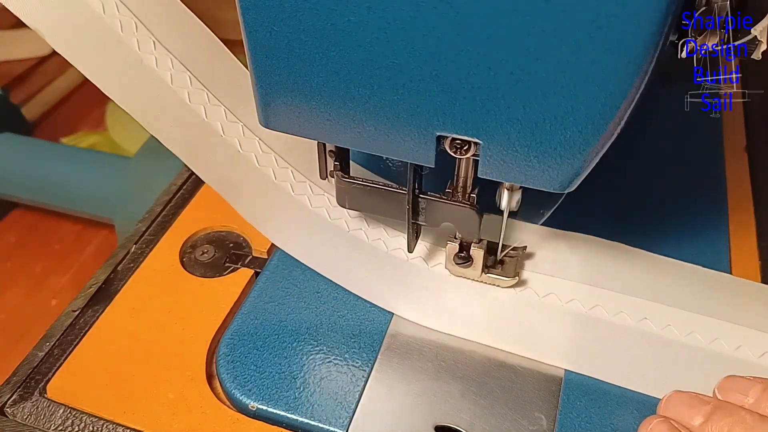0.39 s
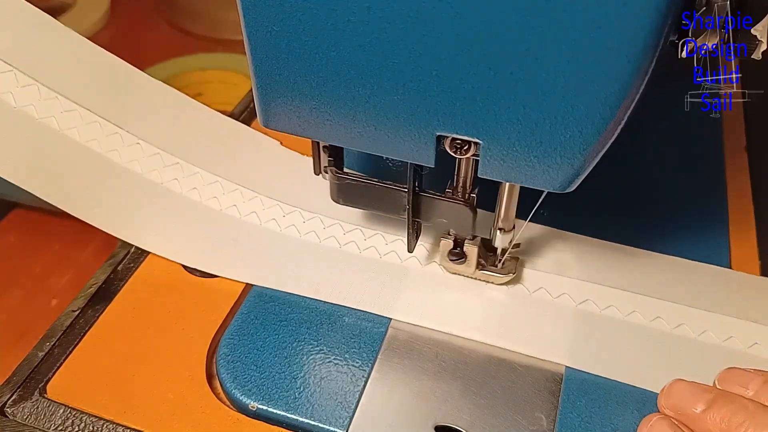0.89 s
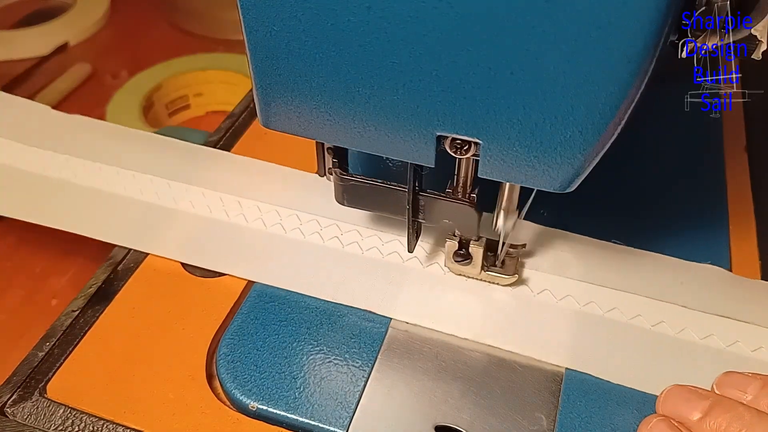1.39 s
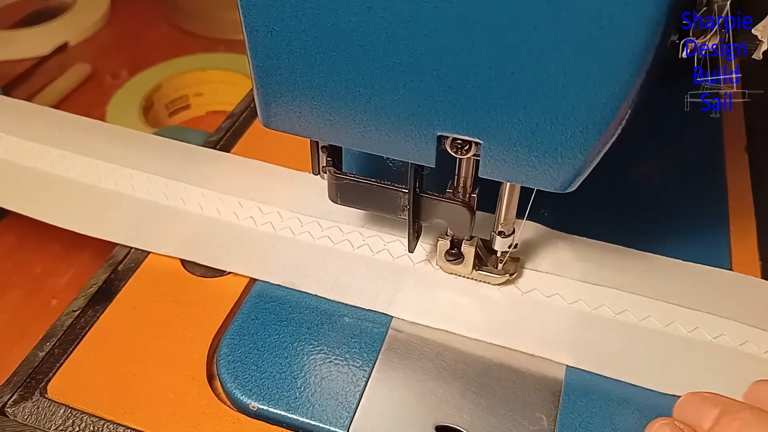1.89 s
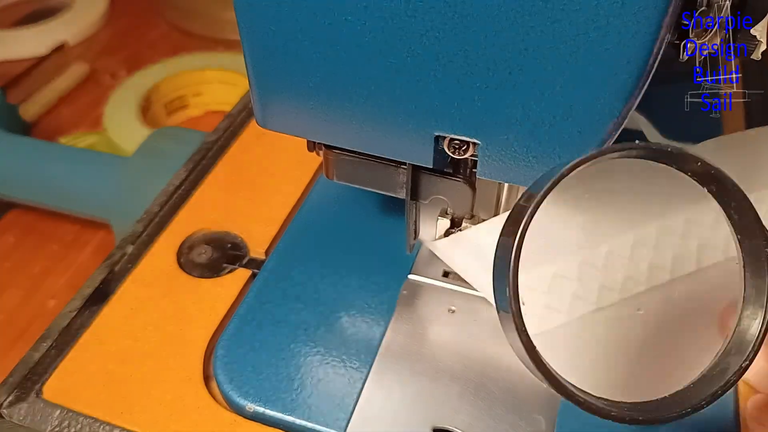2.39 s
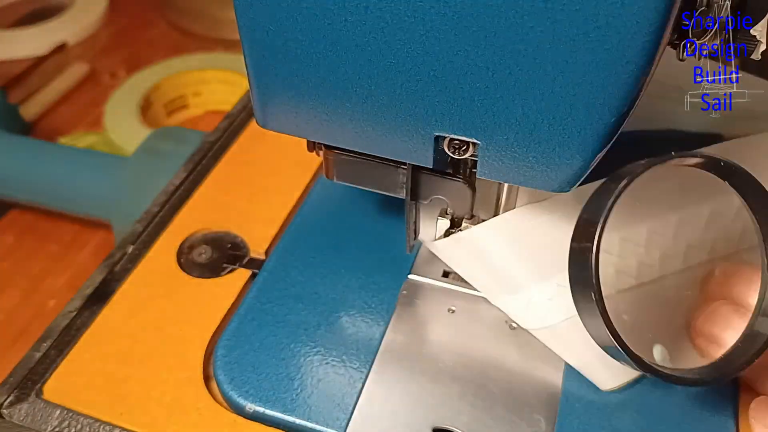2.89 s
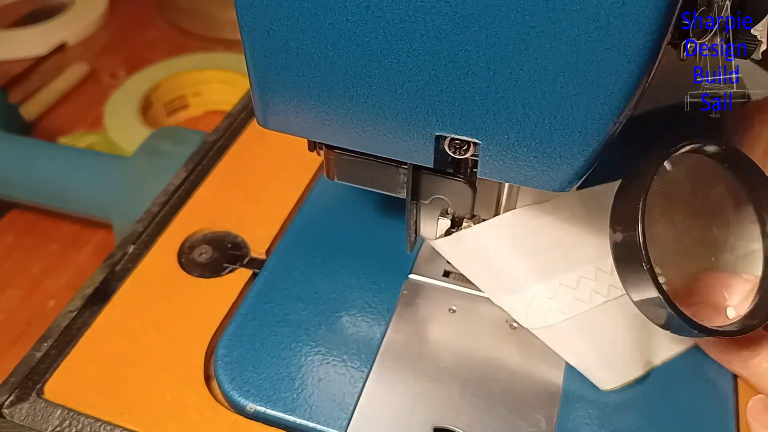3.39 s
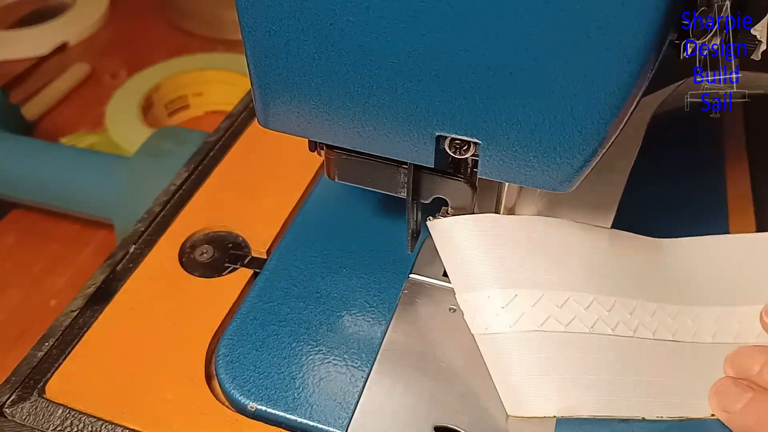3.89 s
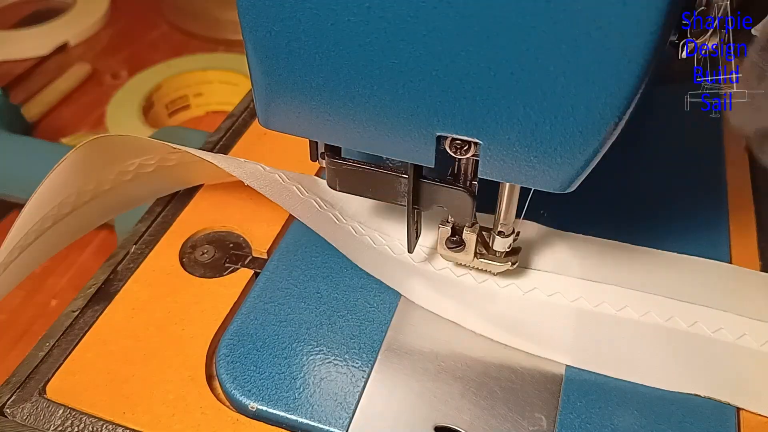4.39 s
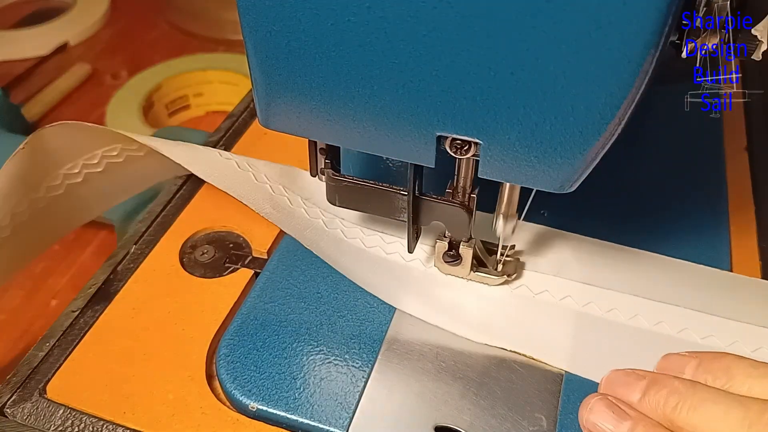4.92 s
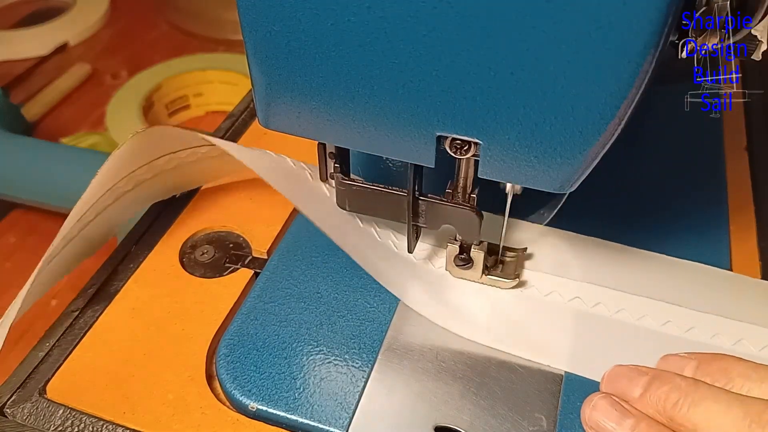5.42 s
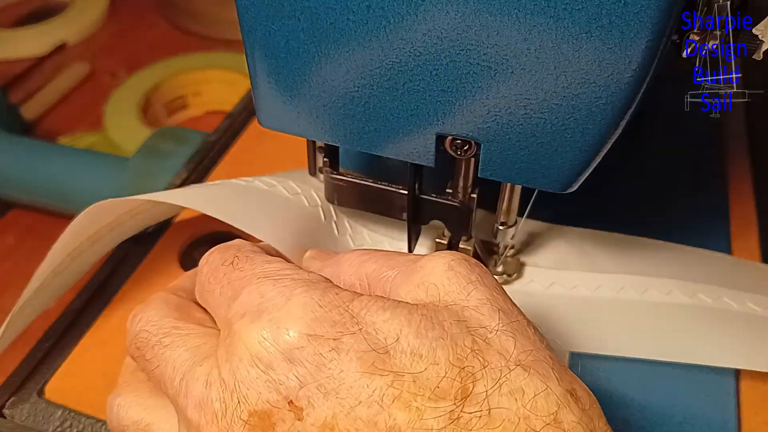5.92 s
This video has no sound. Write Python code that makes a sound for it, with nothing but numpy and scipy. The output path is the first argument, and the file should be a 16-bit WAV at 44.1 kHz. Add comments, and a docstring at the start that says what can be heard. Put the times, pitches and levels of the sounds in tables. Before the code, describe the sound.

A choppy, sped-up sewing session in a small quiet workshop. Two motor runs with metallic clatter and table thud come first, separated by a short gap, the second hitching once. Sparse crisp cloth snaps, rustles and dull knocks follow, thickening into a burst of handling, then the machine whirs again, faster. Close stereo microphone, faint room hum.

```python
"""A sewing machine close to a stereo microphone, heard speeded up: short slices of sound, cross-faded.
Two runs open it: the mains motor whines through the casting over gear and needle clatter made of
shaped noise, and the second run catches once. Then hands shift stiff cloth: noise bursts and decaying
pitches rustle, snap and knock on the table. A third run follows; a quiet room hums throughout."""
import sys
import numpy as np
from scipy import signal
from scipy.fft import rfft, irfft, next_fast_len
from scipy.io import wavfile
from scipy.ndimage import uniform_filter1d

SR = 44100
rng = np.random.default_rng(int(sys.argv[2]) if len(sys.argv) > 2 else 0)


def voltage_ratio(decibels):
    """Convert decibels (scalar or array-like) to amplitude ratios, 20 dB per decade."""
    exponent = np.asarray(decibels, float) / 20
    return 10 ** exponent


def dump_mix(stems):
    """Bounce the given channels to the path in sys.argv[1] as a 16-bit WAV at rate SR."""
    frames = np.atleast_2d(stems).T  # one column per channel
    limited = np.clip(frames, -1, 1)  # hard clip at full scale
    pcm = np.round(limited * 32767).astype(np.int16)
    wavfile.write(sys.argv[1], SR, pcm)


N = 266231

# modes of the machine frame: f/Hz, bandwidth/Hz, level/dB
FRAME_MODES = [(1152, 56, 7.5), (1649, 93, 7), (2115, 110, 4.5), (2410, 110, 5), (2773, 25, 7),
               (3460, 62, 7), (4600, 12, 8)]
# spectrum of the thumping table: f/Hz, level/dB per Hz
TABLE_SPECTRUM = [(30, -47), (193, 2.5), (360, -7), (500, -8.5), (650, -43), (1100, -120)]
# spectrum of the stiff cloth: f/Hz, level/dB per Hz
CLOTH_SPECTRUM = [(350, -11), (700, -2.5), (6100, -4.5), (7500, -12), (16000, -23.5)]
# likeness of left and right for machine and table: f/Hz, likeness/1
MACHINE_LIKENESS = [(60, 0.78), (180, 1), (1100, 0.48), (3500, 0.01)]
# likeness of left and right for cloth and room: f/Hz, likeness/1
LOOSE_LIKENESS = [(200, 0.85), (3000, 0.02)]
# pedal presses: start t/s, stop t/s, clatter level/dB at the middle speed
PEDAL_PRESSES = [(-.1, 0.56, -27.5), (0.715, 1.681, -28.5), (4.648, 5.817, -32)]
# strokes of cloth over the bed: start t/s, stop t/s, rustle level/dB at start, at stop, rumble level/dB
CLOTH_STROKES = [(2.062, 2.197, -38, -37.5, -67), (3.36, 3.417, -43.5, -64, -66.5),
                 (3.525, 3.625, -46.5, -47.5, -56), (3.929, 4.153, -44, -44, -50.5),
                 (4.386, 4.606, -75, -65, -58.5)]

SLICE_S, FIRST_SLICE_S = 1024 / 48000, .0025  # spacing of the slices, time of the first
PULSE_HZ = 99  # the torque pulses twice a mains cycle
MIDDLE_HZ = 1947  # commutator whine at the middle speed
CATCH_S, JOLT_S, RATTLE_S = 1.371, 1.388, 1.415  # the mechanism catches once
RATTLE_MS = 79
SNAP_THUD_DB = -18  # snaps stir the table a little


def motor():
    """Superposition: casting drone, clatter, table thud and belt add, each scaled by the load; the bracket
    rattle adds on its own."""
    # the motor under load: t/s, commutator whine f/Hz, casting drone level/dB
    load_curve = [(0, 1422, -27.5), (.06, 1494, -30), (.3, 1534, -27), (.42, 1576, -31), (.56, 1594, -30.5),
                  (.73, 1713, -28), (.97, 1748, -29.5), (1.25, 1781, -32), (1.35, 1798, -36.5),
                  (1.43, 1810, -45), (1.48, 1725, -31), (1.52, 1652, -31), (1.68, 1660, -30.5),
                  (4.68, 1798, -20), (4.73, 1832, -33), (4.78, 1885, -27.5), (4.86, 1950, -27),
                  (4.895, 1975, -33), (5.02, 2048, -31), (5.47, 2151, -30), (5.69, 2208, -31),
                  (5.75, 2107, -35.5)]
    clatter_db_per_octave = 12  # faster is louder
    quiet_share, quiet_ms = 0.53, 32  # as the mechanism catches
    jolt_db, jolt_ms = -21.5, 13
    whine_hz, drone_db = curves(load_curve)
    octaves = np.log2(whine_hz / MIDDLE_HZ)
    free = 1 - quiet_share * swell(CATCH_S, quiet_ms)
    presses = free * np.array([run(start, stop) for start, stop, _ in PEDAL_PRESSES])
    running = presses.sum(axis=0)
    busy = voltage_ratio([db for _, _, db in PEDAL_PRESSES]) @ presses
    busy = busy * voltage_ratio(clatter_db_per_octave * octaves)
    # the mechanism shakes casting and bracket with flat noise
    shaken = choppy([(300, 0)], MACHINE_LIKENESS, step_db=2.5)
    jolt = voltage_ratio(jolt_db) * swell(JOLT_S, jolt_ms)
    drone = (running * voltage_ratio(drone_db) + jolt) * casting_drone(whine_hz, octaves, shaken)
    engaged = after_start(lag_s=0.19)
    thud = voltage_ratio(-8.5) * choppy(TABLE_SPECTRUM, MACHINE_LIKENESS, step_db=1.0)
    # belt teeth, geared to the motor
    belt = voltage_ratio(-9.5) * engaged * tone(whine_hz / 6, slip=1.3, blur=.04, apart=.1)
    clatter = gear_clatter(commutator_whine(whine_hz, engaged))
    return drone + bracket_rattle(shaken) + busy * (clatter + thud + belt)


def casting_drone(whine_hz, octaves, shaken):
    """Amplitude modulation by the mains splits the armature slot tone; the casting's modes filter it."""
    # mains sidebands, from four below the slot tone to one above: level/dB at the middle speed
    sideband_levels = [-11.5, -4.5, 4, 8, 6, 2]
    # modes of the casting: f/Hz, bandwidth/Hz, level/dB
    casting_modes = [(725, 52, 11), (959, 290, -5.5), (849, 36, 0)]
    stiff_hz = 610  # below this the casting hardly sounds
    sinks_db = 4.5 * octaves  # faster favours the lower sidebands
    slots = 0
    for k, db in enumerate(sideband_levels):
        sideband = tone(whine_hz / 2 + (k - 4) * PULSE_HZ, slip=.4, blur=.012, apart=.25)
        slots = slots + voltage_ratio(db - (k - 3) * sinks_db) * sideband
    slots = unit(slots) * after_start(lag_s=0.13)
    body = resonances(casting_modes)
    return unit(filtered(slots + voltage_ratio(8) * shaken,
                         lambda f: body(f) / np.hypot(1, (stiff_hz / (f + 1)) ** 8)))


def commutator_whine(whine_hz, engaged):
    """Periodic commutation: the bars sound an octave above the slots, in a harmonic series."""
    # multiples one to six: level/dB over the clatter, before the mains swelling
    harmonic_levels = [-17.5, -20.5, -14.5, -17, -25.5, -25]
    whine = 0
    for k, db in enumerate(harmonic_levels):
        whine = whine + voltage_ratio(db) * tone((k + 1) * whine_hz, slip=2, blur=.055 + .015 * k, apart=.7)
    # brush current swells with the mains
    whine = whine * (1 + 0.52 * np.sin(2 * np.pi * PULSE_HZ * np.arange(N) / SR))
    settled = 1 - swell(RATTLE_S, 2 * RATTLE_MS)  # the whine dips around the rattle
    return whine * settled * engaged


def gear_clatter(whine):
    """Random impacts: unevenly swelling noise, with the whine, is coloured by the frame's modes."""
    # spectrum of gears and needle: f/Hz, level/dB per Hz
    gear_spectrum = [(260, -65), (450, -19), (726, -4), (1380, -15), (8800, -23.5), (13000, -32.5),
                     (16000, -35.5)]
    ringing = resonances(FRAME_MODES)
    ticks = uneven(2.64)  # teeth and needle strike unevenly
    strikes = unit(ticks * choppy(gear_spectrum, MACHINE_LIKENESS, step_db=1.22))
    return unit(filtered(strikes + whine, lambda f: np.hypot(1, abs(ringing(f)))))


def bracket_rattle(shaken):
    """Forced vibration: the shaking briefly excites the modes of a bracket."""
    # modes of the bracket: f/Hz, bandwidth/Hz, level/dB
    bracket_modes = [(1146, 120, -3), (2480, 100, -1.5)]
    return voltage_ratio(-32) * swell(RATTLE_S, RATTLE_MS) * unit(filtered(shaken, resonances(bracket_modes)))


def run(start, stop):
    """Transient of one pedal press: it swells evenly to full strength and dies away steeply."""
    swell_s, stop_db_per_s = 0.034, 1694
    rise = np.clip((np.arange(N) / SR - start) / swell_s, 0, 1)
    return held(start, stop, 0, 0, 0, stop_db_per_s) * rise


def after_start(lag_s):
    """Delayed onset: a gain that climbs 300 dB a second to 0 dB, lag_s after each pedal press starts."""
    return sum(held(start + lag_s, stop, 0, 0, 300, 0) for start, stop, _ in PEDAL_PRESSES)


def clacks():
    """Impact excitation: steel parts meet with a short bright crack that rings the frame."""
    # needle bar and hook clacks: t/s, level/dB
    clack_events = [(.109, -29.5), (.287, -29), (0.451, -26.5), (0.473, -21.5), (1.216, -28), (1.307, -31),
                    (1.689, -29.5), (4.671, -32), (4.847, -27), (4.9, -25), (4.99, -28), (5.058, -28),
                    (5.123, -29), (5.166, -25.5), (5.188, -25), (5.531, -30.5), (5.738, -26), (5.81, -25)]
    steel = [(500, -31.0), (1200, -2), (3500, 9), (6500, 8.5), (16000, -16.0)]  # f/Hz, level/dB per Hz
    out = np.zeros((2, N + SR))
    for s, db in clack_events:
        crack = hiss(steel, MACHINE_LIKENESS, count=SR // 10, rings=FRAME_MODES)
        add(out, s, voltage_ratio(db) * crack * burst(length_ms=6.8))
    return out[:, :N]


def touches():
    """Coupled bodies: snaps, crinkles and knocks sound by themselves and thump the table."""
    out, thump = np.zeros((2, N + SR)), np.zeros((1, N + SR))
    snaps(out, thump)
    crinkles(out, thump)
    knocks(out, thump)
    return out[:, :N] + thump[:, :N] * hiss(TABLE_SPECTRUM, MACHINE_LIKENESS)


def snaps(out, thump):
    """Impulsive release: each snap of cloth or tool rings briefly at its own pitch."""
    # cloth and tool snaps: t/s, ring level/dB, ring f/Hz, length/ms, snap level/dB over the ring
    snap_events = [(2.088, -36.5, 2025, 8, 9), (2.112, -32, 1326, 6.7, -3.5), (2.219, -38.5, 4320, 8.2, 5),
                   (2.56, -43, 1304, 12.5, 6), (2.947, -29, 1265, 8.3, 4), (3.265, -40, 1354, 5, 5),
                   (3.33, -31.5, 1330, 7.6, 5.5), (3.35, -40, 1257, 12, 4), (3.366, -37, 1180, 12.3, 1.5),
                   (3.425, -35, 1354, 5.3, 4.5), (3.5, -55, 1990, 13, 12.5), (3.566, -44.5, 2600, 12, 13),
                   (3.63, -49.5, 2640, 17, 10), (3.925, -52, 4550, 19, 6), (3.95, -30.5, 6310, 7.4, 2.5),
                   (3.992, -53, 3500, 6.6, 21.5), (4.033, -50, 3500, 4.1, 21.5),
                   (4.071, -44.5, 3960, 5.1, 11), (4.108, -33.5, 1690, 19, 5.5), (4.122, -30, 2096, 22, -3),
                   (4.144, -31, 2030, 11, -15.5), (4.543, -55, 1147, 12, 19.5)]
    for s, db, hz, length_ms, snap_db in snap_events:
        snap = cloth_snap()
        # low contacts snap less brightly
        dull = unit(filtered(snap, lambda f: 1 / (1 + 1j * f / (4.0 * hz))))
        ring = ringing_at(hz, snap, width_hz=720)
        add(out, s, voltage_ratio(db) * (ring + voltage_ratio(snap_db) * dull) * burst(length_ms))
        add(thump, s, voltage_ratio(db + SNAP_THUD_DB + max(snap_db, 0)) * burst(length_ms)[None])


def crinkles(out, thump):
    """Buckling: the cloth crinkles faintly under the fingers, broadband with a weak pitch."""
    # crinkles: t/s, level/dB
    crinkle_events = [(.667, -70), (1.803, -64.5), (1.835, -64.5), (1.977, -53.5), (2.0, -44.5),
                      (2.322, -47.5), (2.432, -58.5), (2.514, -63.5), (2.652, -56.5), (2.792, -67),
                      (2.818, -68), (2.984, -60.5), (3.008, -65), (3.694, -57), (3.728, -53.5),
                      (3.88, -59.5), (4.204, -60.5), (5.978, -52)]
    length_ms, pitch_hz, ring_db = 12, 1500, -9.5
    for s, db in crinkle_events:
        snap = cloth_snap()
        ring = voltage_ratio(ring_db) * ringing_at(pitch_hz, snap, width_hz=pitch_hz / 2)
        add(out, s, voltage_ratio(db) * (snap + ring) * burst(length_ms))
        add(thump, s, voltage_ratio(db + SNAP_THUD_DB) * burst(length_ms)[None])


def knocks(out, thump):
    """Damped modes: dull knocks on table and bed, and the bodies of a few needle-bar clacks, sound a low pitch
    and a rough upper resonance."""
    # knocks: t/s, level/dB, f/Hz, length/ms; the rows at 0.471, 5.166 and 5.188 s are the bodies of needle-bar
    # clacks
    knock_events = [(.283, -26, 202.5, 10), (0.324, -27.5, 199, 11), (0.471, -24.5, 1050, 7.5),
                    (1.418, -29.5, 422, 20), (1.863, -46.5, 162, 7.2), (1.968, -45, 1050, 7.3),
                    (1.984, -41.5, 178.7, 34), (2.069, -35, 224, 6.1), (2.13, -34, 255.4, 14),
                    (2.258, -39, 824, 14), (2.747, -39, 767, 11), (2.9, -33, 578, 19.4),
                    (3.563, -35, 140.8, 5.2), (3.619, -35.5, 237.6, 6.1), (3.665, -48.5, 171.4, 8.8),
                    (4.1, -22, 291.6, 11), (4.127, -24.5, 547, 19), (4.15, -25.5, 183, 11),
                    (4.27, -60.5, 1045, 12), (4.327, -60.5, 593, 21), (4.395, -40.5, 193.4, 11.6),
                    (4.457, -56, 717, 93), (5.166, -26, 900, 9.9), (5.188, -29, 225, 15)]
    width, upper_ratio = 0.76, 2.2  # bandwidth and upper resonance, over the pitch
    upper_db, cloth_db, thud_db = -12, -18, -11  # knocks stir the cloth a little
    for s, db, hz, length_ms in knock_events:
        snap = cloth_snap()
        upper_body = resonances([(upper_ratio * hz, hz, 0)])
        upper = voltage_ratio(upper_db) * unit(filtered(snap, lambda f: upper_body(f) ** 2))
        sound = ringing_at(hz, snap, width * hz) + upper + voltage_ratio(cloth_db) * snap
        add(out, s, voltage_ratio(db) * sound * burst(length_ms))
        add(thump, s, voltage_ratio(db + thud_db) * burst(length_ms)[None])


def cloth_snap():
    """Broadband excitation: a tenth of a second of cloth noise."""
    return hiss(CLOTH_SPECTRUM, LOOSE_LIKENESS, count=SR // 10)


def ringing_at(hz, drive, width_hz):
    """Resonance: a body struck once gives its clear pitch and rough contact noise coloured by it."""
    body = resonances([(hz, width_hz, 0)])
    clear = np.sqrt(2) * np.sin(2 * np.pi * (hz * np.arange(SR // 10) / SR + rng.random()))
    rough = unit(filtered(drive, lambda f: body(f) ** 2))
    return unit(clear + 1.1 * rough)


def drag():
    """Sliding friction: stiff cloth gives a grainy rustle and a low rumble through the table."""
    slopes = 798, 710  # grip and let go (dB a second)
    pull = sum(held(a, b, first, last, *slopes) for a, b, first, last, _ in CLOTH_STROKES)
    weight = sum(held(a, b, db, db, *slopes) for a, b, _, _, db in CLOTH_STROKES)
    grain = uneven(2.7)  # creases let go unevenly
    rustle = unit(grain * choppy(CLOTH_SPECTRUM, LOOSE_LIKENESS, step_db=2))
    return pull * rustle + weight * choppy(TABLE_SPECTRUM, LOOSE_LIKENESS, step_db=4)


def room():
    """Diffuse field: the quiet room is steady low noise, alike left and right only in the bass."""
    # spectrum of the room: f/Hz, level/dB per Hz
    room_spectrum = [(30, -24), (130, -8), (400, -23.5), (1500, -24.5), (16000, -44)]
    return voltage_ratio(-73) * choppy(room_spectrum, LOOSE_LIKENESS, step_db=2)


def unit(x):
    """Normalization: scale to rms 1."""
    return x / np.sqrt(np.mean(x ** 2) + 1e-20)


def along(points, hz):
    """Logarithmic frequency scale: interpolate (f/Hz, value) points along it."""
    f, v = np.transpose(points)
    return np.interp(np.log(hz + 1), np.log(f + 1), v)


def curves(rows):
    """Linear interpolation: one value per sample for each column after the time."""
    s, *cols = np.transpose(rows)
    return [np.interp(np.arange(N) / SR, s, c) for c in cols]


def filtered(x, response):
    """Linear filtering: multiply the spectrum of x by a response of frequency."""
    m = next_fast_len(x.shape[-1] + 4096)
    spectrum = rfft(x, m) * response(np.fft.rfftfreq(m, 1 / SR))
    return irfft(spectrum, m)[..., :x.shape[-1]]


def resonances(modes):
    """Modal superposition: causal response of (f/Hz, bandwidth/Hz, level/dB) modes, signs alternating."""
    def response(f):
        return sum((-1) ** k * voltage_ratio(db) * 1j * f * width / (c * c - f * f + 1j * f * width)
                   for k, (c, width, db) in enumerate(modes))
    return response


def hiss(spectrum, alike, count=N, rings=()):
    """Partial coherence: mid and side noises give stereo of rms 1, with the modes of a body on top."""
    def response(hz):
        turn = np.arccos(np.clip(along(alike, hz), -1, 1)) / 2
        body = abs(1 + resonances(rings)(hz))
        return voltage_ratio(along(spectrum, hz)) * body * np.array([np.cos(turn), np.sin(turn)])
    mid, side = filtered(rng.standard_normal((2, count)), response)
    return unit(np.array([mid + side, mid - side]))


def spliced(piece):
    """Overlap-add: cross-fade piece(slice number) into piece(next slice number)."""
    place = (np.arange(N) / SR - FIRST_SLICE_S) / SLICE_S + 1
    k = place.astype(int)
    fade = np.sin(np.pi / 2 * (place - k)) ** 2
    return (1 - fade) * piece(k) + fade * piece(k + 1)


def choppy(spectrum, alike, step_db):
    """Incoherent splicing: noise slices from unrelated moments, each at its own level."""
    forward = hiss(spectrum, alike)
    backward = forward[:, ::-1]
    gain = voltage_ratio(step_db * rng.standard_normal(400))
    return unit(spliced(lambda k: gain[k] * np.where(k % 2, forward, backward)))


def uneven(depth_db):
    """Random amplitude modulation: a gain of smoothed noise, its spread in dB rms."""
    return voltage_ratio(depth_db * unit(uniform_filter1d(rng.standard_normal(N), size=150)))


def tone(hz, slip, blur, apart):
    """Phase diffusion: a stereo partial whose phase wanders, and slips from slice to slice."""
    chance = rng.standard_normal((3, 400))
    phase = np.cumsum(2 * np.pi * hz / SR + blur * rng.standard_normal(N))
    slips = np.cumsum(slip * chance[0])
    left_right = apart * chance[2] * np.array([[1], [-1]])
    each = voltage_ratio(2.5 * chance[1]) * np.exp(1j * (slips + left_right))
    return unit((np.exp(1j * phase) * spliced(lambda k: each[:, k])).imag)


def burst(length_ms):
    """Transient envelope: a bell centred in a tenth of a second, with a longer tail than rise."""
    t = np.arange(-SR // 20, SR // 20) / SR
    return voltage_ratio(-8 * np.abs(t / (length_ms / 1000 * np.where(t < 0, .45, .6))) ** 1.86)


def add(out, s, sound):
    """Superposition: mix a burst in, centred at s seconds."""
    out[:, round(s * SR) - SR // 20:][:, :sound.shape[1]] += sound


def swell(s, length_ms):
    """Transient envelope: one burst shape on the whole time line."""
    out = np.zeros((1, N + SR))
    add(out, s, burst(length_ms)[None])
    return out[0, :N]


def held(start, stop, first_db, last_db, rise, fall):
    """Exponential growth and decay: swells up to start, glides to stop, dies away (slopes dB/s)."""
    t, out = np.arange(N) / SR, np.zeros(N)
    near = slice(max(round((start - .2) * SR), 0), round((stop + .2) * SR))  # silent beyond 0.2 s
    t = t[near]
    glide = np.interp(t, [start, stop], [first_db, last_db])
    out[near] = voltage_ratio(glide - rise * np.maximum(start - t, 0) - fall * np.maximum(t - stop, 0))
    return out


def scene():
    """Superposition: machine, hands and room, placed by level differences between the channels; the clack
    bodies kept among the knocks are placed with the hands."""
    # lean of the machine: f/Hz, left-right level/dB
    machine_lean = [(200, -0.5), (750, 2.5), (2400, -0.5), (12000, 2)]
    # where the hands work: t/s, left-right level/dB
    hand_places = [(1.999, 0), (2.701, -1), (4.102, -1)]
    sides = np.array([[1], [-1]])
    machine = filtered(motor() + clacks(), lambda hz: voltage_ratio(along(machine_lean, hz) / 2 * sides))
    side_db, = curves(hand_places)
    hands = (touches() + drag()) * voltage_ratio(side_db / 2 * sides)
    return machine + hands + room()


def roll_off(x):
    """The treble ends steeply here."""
    return signal.sosfilt(signal.butter(12, 16480, fs=SR, output="sos"), x)


def record(dry):
    """Band limiting: the microphone loses the deep bass below 70 Hz and the top above 16.4 kHz."""
    heard = filtered(dry, lambda hz: 1j * hz / (70 + 1j * hz) * (hz < 16400))
    return roll_off(heard)


dry = scene()
out = record(dry)
dump_mix(out)
```